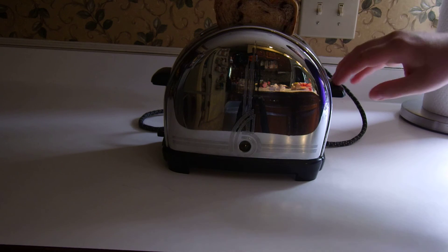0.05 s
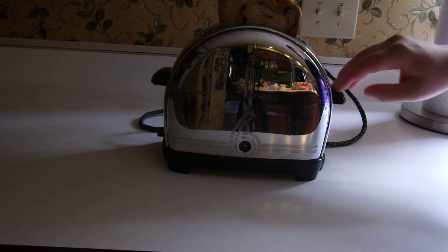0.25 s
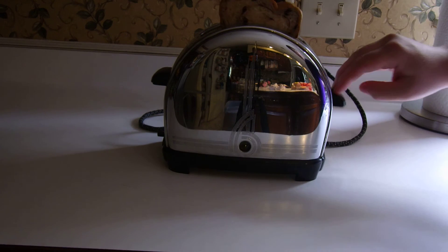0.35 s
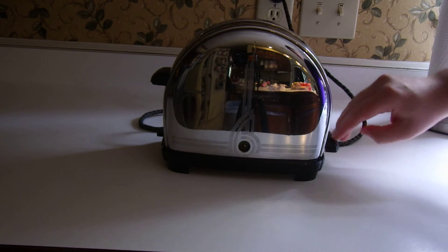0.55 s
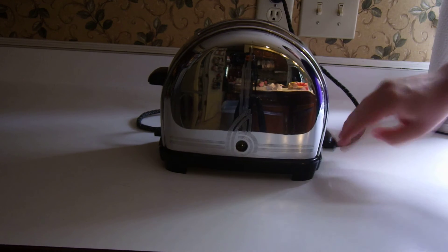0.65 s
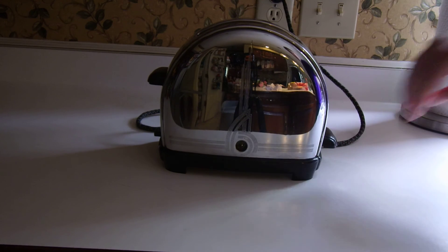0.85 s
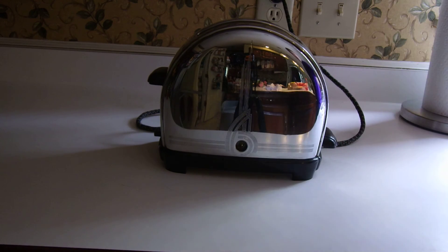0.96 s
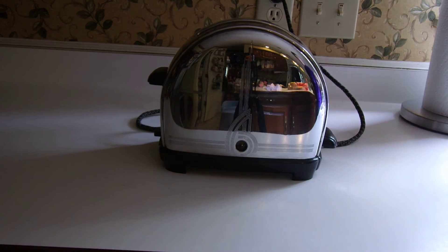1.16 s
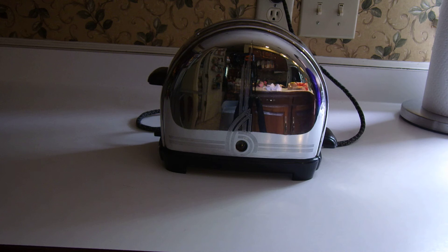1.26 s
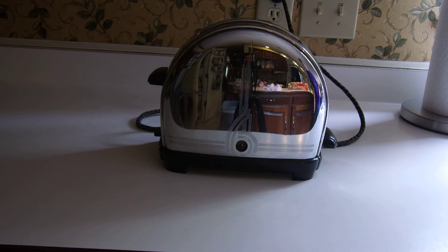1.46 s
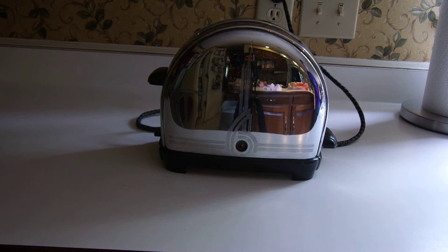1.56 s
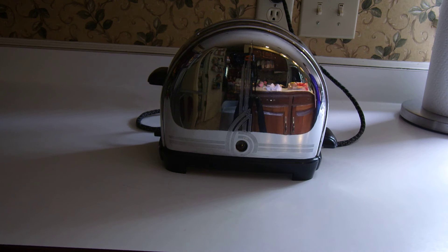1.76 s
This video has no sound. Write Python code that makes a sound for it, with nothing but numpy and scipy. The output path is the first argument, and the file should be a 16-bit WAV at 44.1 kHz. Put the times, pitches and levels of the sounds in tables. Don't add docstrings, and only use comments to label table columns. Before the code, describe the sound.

Toaster lever pressed down in a quiet kitchen: knock, click, gritty metal rattle, sharp latch clunk.

```python
import sys
import numpy as np
from scipy import signal
from scipy.io import wavfile
from scipy.ndimage import uniform_filter1d

SR = 44100
rng = np.random.default_rng(int(sys.argv[2]) if len(sys.argv) > 2 else 0)


def linear_from_db(decibels):
    return 10 ** (np.asarray(decibels, float) / 20)


def wav_out(sig):
    wavfile.write(sys.argv[1], SR, np.round(np.clip(np.atleast_2d(sig).T, -1, 1) * 32767).astype(np.int16))


N = 79380

BODY_TOP_HZ = 6640


def level(x, db):
    return x * linear_from_db(db) / np.sqrt(np.mean(x ** 2))


def band(x, hz, width_hz):
    return signal.lfilter(*signal.iirpeak(hz, hz / width_hz, SR), x)


def noise_band(hz, width_hz):
    return band(rng.standard_normal(N), hz, width_hz)


def after(t, start):
    return np.clip(t - start, 0, None)


def decay(t, t60):
    return 1000 ** (-t / t60)


def sine(t, hz):
    return np.sin(2 * np.pi * hz * t)


def ring(x, hz, t60):
    pole = np.exp((2j * np.pi * hz - np.log(1000) / t60) / SR)
    return signal.lfilter([1], [1, -pole], x).imag


def tail(t60, hz, width_hz):
    t = np.arange(SR) / SR
    noise = band(rng.standard_normal(SR), hz, width_hz) * decay(t, t60)
    return noise / np.sqrt(np.sum(noise ** 2))


def walk(rate):
    k = int(SR / rate)
    steps = np.repeat(rng.standard_normal(N // k + 1), k)
    wander = uniform_filter1d(uniform_filter1d(steps, k), k)[:N]
    return wander / wander.std()


# (time [s], level [dB])
GAIN = [
    (0, 0),
    (.36, -1.5),
    (.44, 0.5),
    (.56, 6),
    (.62, -5.5),
    (.8, -24.5),
    (.94, -20.5),
    (1.8, -11),
]


def gain_db(t):
    return np.interp(t, *np.array(GAIN).T)


# (time [s], pitch [Hz], level [dB])
DRONE = [(0, 59.8, -42), (0.121, 58.36, -41.5), (0.188, 58.1, -45), (.26, 55.35, -43), (.35, 52.5, -53),
         (.46, 57.55, -42), (0.599, 54.9, -44), (.66, 50.8, -45), (0.951, 49.8, -50.5),
         (1.11, 50.66, -55.5), (1.16, 49.8, -54), (1.238, 51.2, -67), (1.28, 51.2, -42), (1.4, 51.2, -46.5),
         (1.568, 51.7, -43.5), (1.62, 52.8, -53), (1.687, 51.1, -42), (1.8, 49.7, -55)]


def drone(t):
    s, hz, db = np.array(DRONE).T
    pitch = np.interp(t, s, hz) * (1 + 0.028 * walk(5))
    phase = 2 * np.pi * np.cumsum(pitch) / SR
    loudness_db = np.interp(t, s, db) - gain_db(t) + 1.0 * walk(51)
    return np.sqrt(2) * linear_from_db(loudness_db) * np.sin(phase)


AIR_DB = -37.5
HISS_DB, HISS_HZ, HISS_WIDTH_HZ = -59, 12700, 7400
# (pitch [Hz], level [dB per Hz])
AIR = [(47, -42), (80, -2.5), (145, -11.5), (299, 2), (687, -20), (917, -10), (2480, -40), (3190, -46),
       (6000, -56.5), (7800, -77), (13200, -120)]
# (pitch [Hz], width [Hz], level [dB])
AIR_LINES = [(310.1, 23, -43), (352, 9.6, -50), (425.2, 21, -44.5), (223, 25, -56.5), (3465, 500, -62)]


def air():
    hz, db = np.array(AIR).T
    tone, swell = 0, walk(3.7)
    for f in 100 * 2 ** np.arange(0, 6.1, .5):
        colour_db = np.interp(np.log(f), np.log(hz), db) + 1.0 * swell + 0.5 * walk(2.9)
        tone = tone + linear_from_db(colour_db) * band(noise_band(f, f / 2), f, f / 2)
    lines = sum(level(noise_band(f, width), d) for f, width, d in AIR_LINES)
    hiss = level(noise_band(HISS_HZ, HISS_WIDTH_HZ), HISS_DB)
    return level(tone, AIR_DB - 5.0) + lines * linear_from_db(0.95 * swell) + hiss


def rumble():
    deep = noise_band(29.8, 30)
    upper = band(noise_band(97, 120), 97, 120)
    return level(deep + linear_from_db(-5) * upper, -50.5)


CHATTER_DB = 0
# (time [s], base level [dB], shell level [dB], rack level [dB], rattle time [ms])
HITS = [(0.221, -21.5, -32, -46, 3.9), (0.236, -20.5, -44, -50.5, 4), (0.258, -38, -40.5, -41, 6.6),
        (.365, -46, -31, -24, 4.7), (.378, -34.5, -40.5, -27.5, 25), (.42, -38, -53, -36.5, 6),
        (0.449, -39, -34.5, -31, 4.9), (.488, -34, -26, -31, 5.1), (.494, -23.5, -42.5, -44, 6.1),
        (.509, -22.5, -39.5, -50, 22), (.523, -24, -45, -50, 3.6), (.541, -25, -21.5, -29.5, 4),
        (.549, -29, -36.5, -37, 8), (.571, -32, -9, -31.5, 5.5), (.579, -13.5, -21, -23.5, 17.5),
        (.604, -24.5, -18, -43, 10), (.616, -34.5, -17, -19.5, 2.9), (.622, -40, -24.5, -53, 6.6),
        (.76, -44, -41.5, -72.5, 17), (.782, -39.5, -51.5, -58.5, 4.9), (.791, -42, -57.5, -81, 2),
        (1.446, -40.5, -50.5, -76, 8.1), (1.462, -45.5, -62.5, -78, 3.3)]


def rattles():
    t = np.arange(4096) / SR
    out = np.zeros((len(HITS), N))
    for row, (s, _, _, _, rattle_ms) in zip(out, HITS):
        noise, unevenness = rng.standard_normal((2, len(t)))
        burst = noise * linear_from_db(CHATTER_DB * unevenness) * np.exp(-t * 1000 / rattle_ms)
        burst[0] = 0.234 * np.sqrt(np.sum(burst ** 2))
        start = int(s * SR)
        row[start:start + len(t)] = burst / np.sqrt(np.sum(burst ** 2))
    return out


DETUNE = .012
SPREAD_DB = 2


def part(force, modes, hit_db, push_ms, clatter):
    t = np.arange(256) / SR
    push = t * np.exp(-t * 5000 / push_ms)
    push = push / push.sum()
    force = signal.fftconvolve(force * linear_from_db(hit_db)[:, None], push[None])[:, :N]
    share = linear_from_db(SPREAD_DB * rng.standard_normal((len(HITS), len(modes), 2)))
    tones = 0
    for m, (hz, db, t60) in enumerate(modes):
        for k in range(2):
            pitch = hz * (1 + DETUNE * (k - .5))
            tones = tones + linear_from_db(db - 3.0) * ring(share[:, m, k] @ force, pitch, t60)
    hz, width_hz, db, t60 = clatter
    noise = 0
    for k in range(4):
        response = band(tail(t60, hz, width_hz), hz, width_hz)
        noise = noise + signal.fftconvolve(force[k::4].sum(axis=0), response)[:N]
    return tones + linear_from_db(db) * 20 * noise


BASE_PUSH_MS, SHELL_PUSH_MS, RACK_PUSH_MS = 1.11, 0.42, 0.11
# (pitch [Hz], level [dB], t60 [s])
BASE = [(312.3, -6, 0.17), (319, 0.5, 0.092), (369.5, 0, 0.099), (435, -6, 0.054), (475, -4, 0.097),
        (558.3, -5.5, 0.1), (605.6, -3.5, 0.11), (680, -10, 0.023)]
SHELL = [(815, -11, 0.077), (904.7, -6.5, 0.1), (964.7, -1.5, 0.07), (1120, -24, 0.39), (1234, -4.5, 0.1),
         (1365, -1.5, 0.079), (1445, -5.5, 0.14), (1490, -9, 0.038), (1720, -25, 0.092), (1871, -12, 0.04),
         (2070, -7, 0.22), (2249, -8, 0.29), (2183, -17.5, 0.24), (2508, -5.5, 0.18)]
RACK = [(3410, -9, 0.48), (3448, -7.5, 0.22), (3830, -12.5, 0.12), (3750, -14, 0.17), (4420, -18.5, .2),
        (4630, -12, .15), (5230, -18, 0.11), (5900, -17.5, 0.18), (6390, -17.5, 0.25), (6530, -15.5, 0.17)]
# (centre [Hz], width [Hz], level [dB], t60 [s])
CLATTER = [
    (454, 1507, -2, 0.043),
    (1690, 3570, 5.5, .14),
    (4554, 3750, 8, 0.097),
]


def toaster_body():
    force, hits = rattles(), np.array(HITS)
    lift_db = -gain_db(hits[:, 0])
    base = part(force, BASE, hits[:, 1] + lift_db, BASE_PUSH_MS, CLATTER[0])
    shell = part(force, SHELL, hits[:, 2] + lift_db, SHELL_PUSH_MS, CLATTER[1])
    rack = part(force, RACK, hits[:, 3] + lift_db, RACK_PUSH_MS, CLATTER[2])
    low_pass = signal.butter(8, BODY_TOP_HZ, fs=SR, output="sos")
    return signal.sosfilt(low_pass, base + shell + rack)


FLEX_HZ = 73.25
# (time [s], level [dB], rise [s], t60 [s])
FLEX = [
    (0.224, -28, 0.028, 0.24),
    (0.258, -27.5, 0.014, 0.32),
    (0.501, -23, 0.063, 0.88),
    (0.645, -25, 0.016, .3),
    (.7, -41, .03, 0.95),
    (1.446, -34.5, .015, 0.22),
    (1.489, -41, 0.019, 0.38),
]


def counter(t):
    out = 0
    for s, db, rise, t60 in FLEX:
        u = after(t, s)
        swell = (1 - np.exp(-u / rise)) * decay(u, t60)
        out = out + linear_from_db(db - gain_db(s + rise)) * 2 * swell * sine(u, FLEX_HZ)
    return out


# (time [s], pitch [Hz], level [dB], t60 [s])
PINGS = [(0.259, 2600, -38, 0.041), (.366, 2058, -35.5, 0.066), (.452, 597, -25.5, 0.075),
         (.452, 467, -27, 0.1), (.452, 831, -31, 0.077), (.62, 2277, -49.5, 1.6), (0.623, 2506, -51.5, 1.9),
         (.63, 355, -38, 0.36), (0.641, 229.5, -47, .5), (.488, 6410, -40.5, .12), (.49, 8000, -45, .06),
         (.549, 6280, -36, .06), (.575, 3840, -30.5, 0.11), (0.788, 102.6, -39, 0.19),
         (1.45, 94.3, -30, 0.17)]


def pings(t):
    out = 0
    for s, hz, db, t60 in PINGS:
        u = after(t, s)
        shape = (1 - np.exp(-u * hz / 3)) * decay(u, t60)
        out = out + linear_from_db(db - gain_db(s) + 1.6 * walk(25)) * 2 * shape * sine(u, hz)
    return out


SNAP_HZ, SNAP_WIDTH_HZ, SNAP_TAIL_DB, SNAP_TAIL_S = 9900, 2800, -10, 0.1
SHIMMER_HZ, SHIMMER_WIDTH_HZ, SHIMMER_DB, SHIMMER_T60_S = 10050, 1400, -14, .55
# (time [s], level [dB], t60 [s])
SNAPS = [(.26, -50.5, .04), (0.368, -39.5, .06), (.449, -40.5, .06), (.488, -38.5, .05), (.549, -38, .09),
         (.559, -46, .04), (0.577, -32, 0.051), (0.593, -42.5, .05), (0.615, -22.5, .01),
         (0.618, -30.5, .05), (.628, -39.5, .04)]


def snaps():
    ticks, cracks = np.zeros(N), np.zeros(N + SR)
    for s, db, t60 in SNAPS:
        start = int(s * SR)
        ticks[start] = linear_from_db(db - gain_db(s)) * 10
        cracks[start:start + SR] += ticks[start] * tail(t60, SNAP_HZ, SNAP_WIDTH_HZ)
    after_ring = linear_from_db(SNAP_TAIL_DB) * 2 * tail(SNAP_TAIL_S, SNAP_HZ, SNAP_WIDTH_HZ / 2)
    shimmer = tail(SHIMMER_T60_S, SHIMMER_HZ, SHIMMER_WIDTH_HZ)
    shimmer = linear_from_db(SHIMMER_DB) * 2 * band(shimmer, SHIMMER_HZ, SHIMMER_WIDTH_HZ)
    return cracks[:N] + signal.fftconvolve(ticks, after_ring + shimmer)[:N]


SCRAPE_HZ, SCRAPE_WIDTH_HZ, GRIT_DB = 1798, 5100, 1.5
# (time [s], level [dB])
SCRAPE = [
    (.36, -92.5),
    (.45, -44.5),
    (.53, -36),
    (.6, -31.5),
    (.64, -41),
    (.72, -47),
    (.8, -53.5),
    (.88, -64.5),
    (.96, -120),
]


def scrape(t):
    grit = rng.standard_normal(N)
    bumps = np.minimum(rng.exponential(size=N), 4)
    grit = grit * linear_from_db(GRIT_DB * bumps + 1.6 * walk(80))
    grit = band(band(grit, SCRAPE_HZ, SCRAPE_WIDTH_HZ), SCRAPE_HZ, SCRAPE_WIDTH_HZ)
    grit = signal.sosfilt(signal.butter(4, BODY_TOP_HZ, fs=SR, output="sos"), level(grit, 0))
    return grit * linear_from_db(np.interp(t, *np.array(SCRAPE).T) - gain_db(t))


KNOCK_RISE_S = .002
KNOCK_S = [.364, .364, .366, .49, .55, .551, .571, .62, .62, .62, .63, .735, .785, 1.445, 1.447, 1.452,
           1.47]
# (level [dB], centre [Hz], width [Hz], t60 [s])
KNOCKS = [(-8, 4400, 1300, 0.39), (-11, 6300, 1000, .25), (-13.5, 730, 210, .15), (-18.5, 6900, 4000, .4),
          (-3, 120, 150, .3), (-16, 11000, 4000, .3), (5, 780, 250, 0.18), (-8, 3900, 1100, .8),
          (2, 540, 170, 0.42), (-15.5, 6300, 1300, 0.82), (-7.5, 140, 120, 0.35), (-20, 630, 750, .1),
          (-12, 360, 350, .1), (-15.5, 970, 1000, 0.19), (-26, 2300, 1050, .15), (-25.5, 3870, 900, .13),
          (-18, 230, 94, 0.17)]


def knocks():
    out = np.zeros(N + SR)
    rise = 1 - np.exp(-np.arange(SR) / SR / KNOCK_RISE_S)
    for s, (db, hz, width_hz, t60) in zip(KNOCK_S, KNOCKS):
        knock = band(rise * tail(t60, hz, width_hz), hz, width_hz)
        start = int(s * SR)
        out[start:start + SR] += linear_from_db(db - gain_db(s)) * band(knock, hz, width_hz)
    return out[:N]


CLICK_S, LATCH_S, WIRE_WOBBLE_DB = .365, .617, 5
# (pitch [Hz], level [dB], t60 [s])
CLICK_WIRES = [(3260, -49.5, 0.27), (3628, -42.5, 0.2), (3930, -36, .3), (4410, -45.5, 0.29),
               (4660, -43, 0.23), (4750, -49.5, .25), (5840, -43.5, 0.31), (6130, -44, 0.095),
               (6464, -43, 0.32), (6640, -49, .2)]
LATCH_WIRES = [(1970, -57, 1.5), (3405, -57.5, 1.6), (3590, -57.5, 2.1), (3840, -56.5, 1.3),
               (4416, -60.5, .9), (6320, -64.5, .8), (6700, -62, 1.1), (9450, -65.5, 1), (9787, -65, 1.2),
               (10379, -63, 0.96)]


def wires(t):
    out = 0
    for s, modes in ((CLICK_S, CLICK_WIRES), (LATCH_S, LATCH_WIRES)):
        u = after(t, s)
        for hz, db, t60 in modes:
            loudness = linear_from_db(db - gain_db(s) + WIRE_WOBBLE_DB * walk(45))
            out = out + loudness * 2 * decay(u, t60) * sine(u, hz)
    return out


TWANG_S, TWANG_RISE_S, TWANG_STOP_S, TWANG_T60_S = .368, 0.011, .455, 0.27
# (pitch [Hz], level [dB])
TWANG = [(301, -48.5), (447, -37.5), (672, -50), (889, -41), (1113, -48.5), (1314, -48), (1459, -52.5),
         (2266, -56)]


def twang(t):
    u = after(t, TWANG_S)
    damping = 1 + np.exp((t - TWANG_STOP_S) / 0.0046)
    shape = (1 - np.exp(-u / TWANG_RISE_S)) * decay(u, TWANG_T60_S) / damping
    return shape * sum(2 * linear_from_db(db + 2.0 * walk(84)) * sine(u, hz) for hz, db in TWANG)


ROOM_DB, ROOM_T60_S, ROOM_TREBLE_T60_S, ROOM_DELAY_S = -18.5, 0.71, .3, .006


def kitchen_echo(x):
    echo = tail(ROOM_T60_S, 690, 2200) + linear_from_db(-4) * tail(ROOM_TREBLE_T60_S, 3600, 5000)
    echo = np.concatenate([np.zeros(int(ROOM_DELAY_S * SR)), echo])
    return linear_from_db(ROOM_DB) * signal.fftconvolve(x, echo)[:N]


BODY_CUT_HZ = 255


def scene():
    t = np.arange(N) / SR
    high_pass = signal.butter(3, BODY_CUT_HZ, "high", fs=SR, output="sos")
    near = signal.sosfilt(high_pass, toaster_body() + snaps())
    near = near + twang(t) + pings(t) + wires(t) + knocks() + scrape(t)
    return (near + kitchen_echo(near) + rumble() + counter(t) + drone(t) + air())[None]


def top_cut(x):
    return signal.sosfilt(signal.butter(12, 16320, fs=SR, output="sos"), x)


LIMIT = 0.92
TOP_HZ = 15680
# (pitch [Hz], width [Hz])
NOTCHES = [(3185, 1060), (4090, 350), (5140, 1640), (5660, 750), (7130, 550), (8190, 30)]


def record(dry):
    x = dry * linear_from_db(gain_db(np.arange(N) / SR))
    x = LIMIT * np.tanh(x / LIMIT)
    for hz, width_hz in NOTCHES:
        x = signal.lfilter(*signal.iirnotch(hz, hz / width_hz, SR), x)
    x = signal.sosfilt(signal.ellip(10, .2, 60, TOP_HZ, fs=SR, output="sos"), x)
    return top_cut(x)


dry = scene()
out = record(dry)
wav_out(out)
```